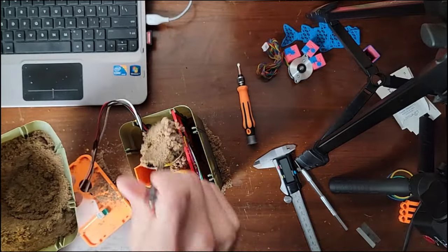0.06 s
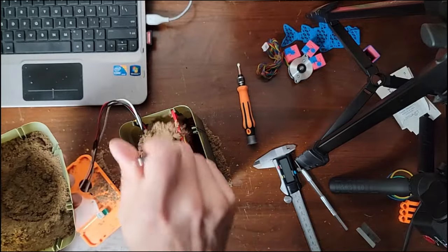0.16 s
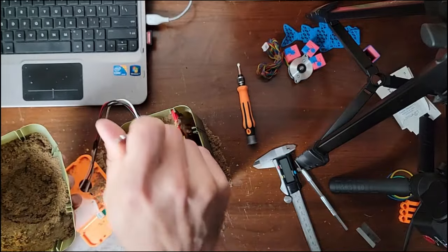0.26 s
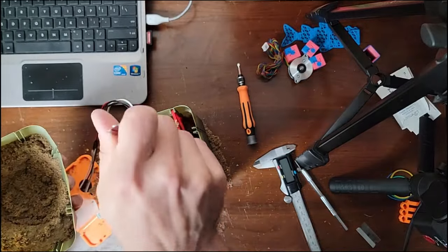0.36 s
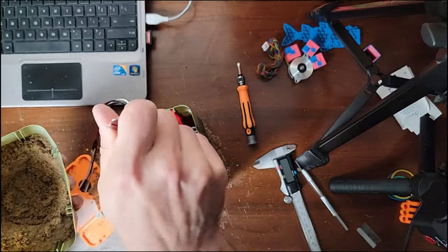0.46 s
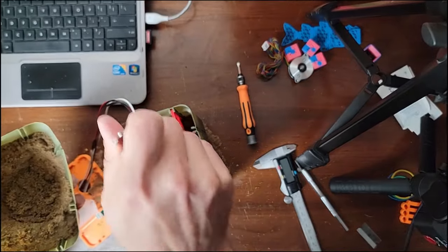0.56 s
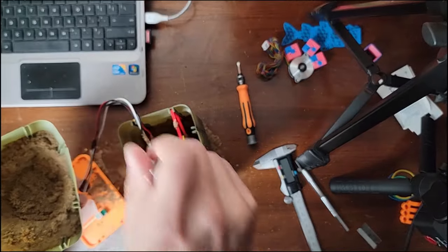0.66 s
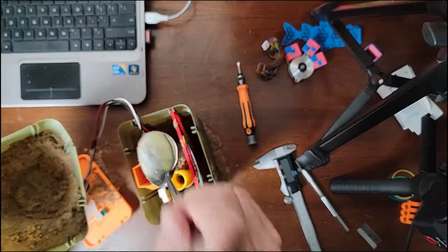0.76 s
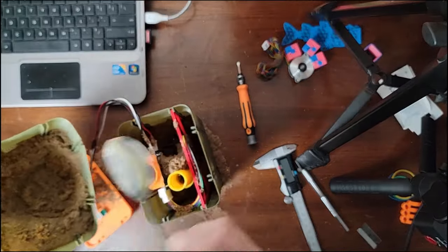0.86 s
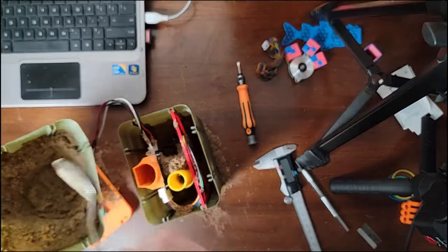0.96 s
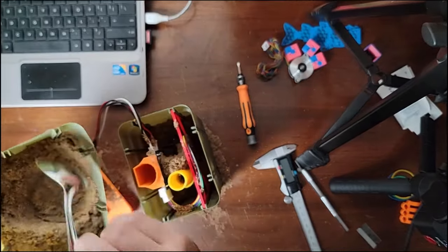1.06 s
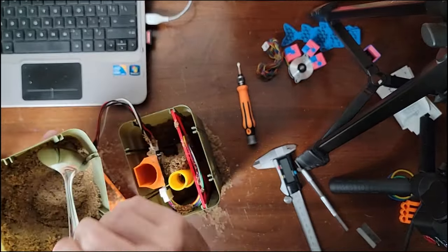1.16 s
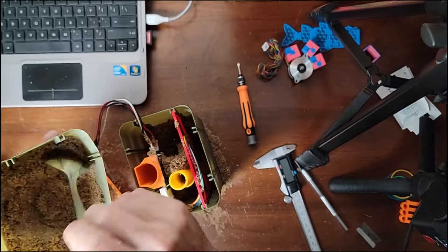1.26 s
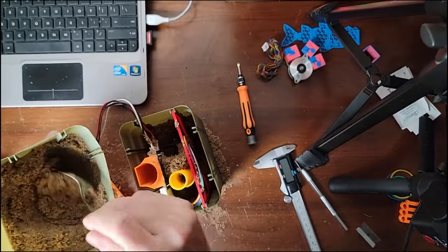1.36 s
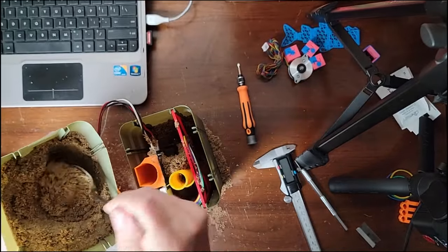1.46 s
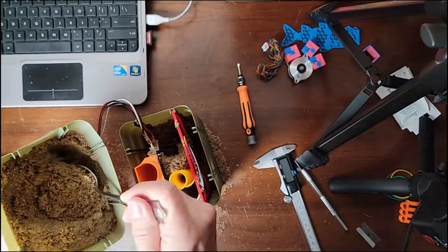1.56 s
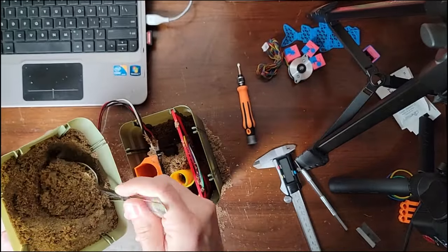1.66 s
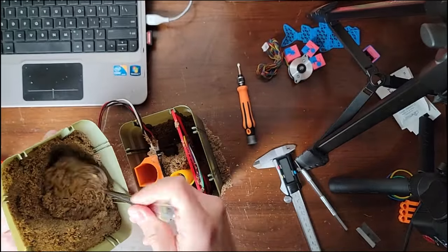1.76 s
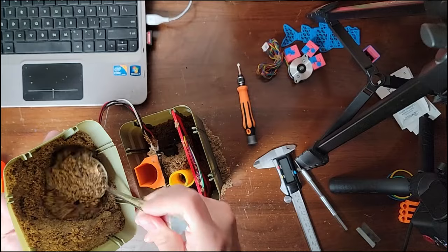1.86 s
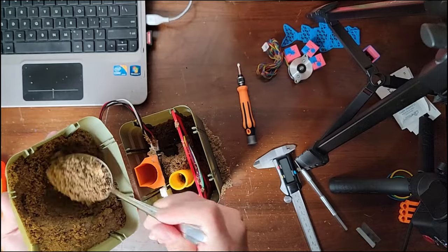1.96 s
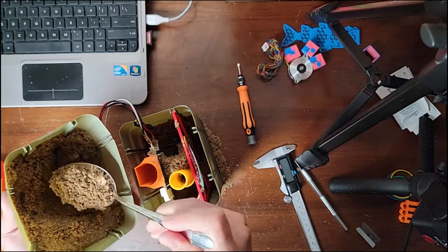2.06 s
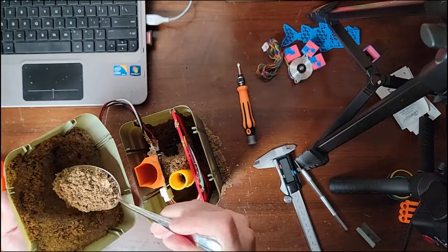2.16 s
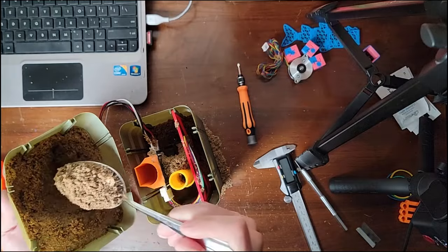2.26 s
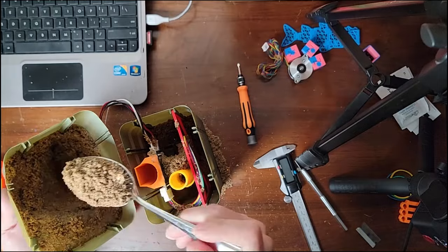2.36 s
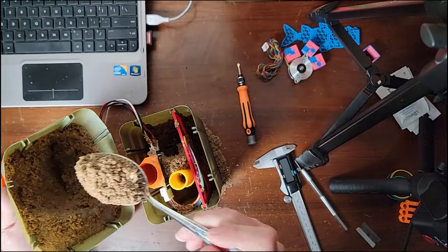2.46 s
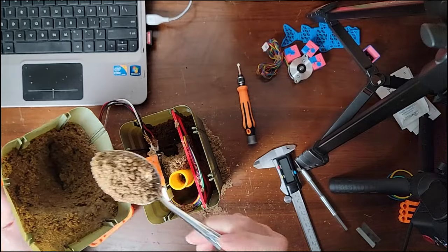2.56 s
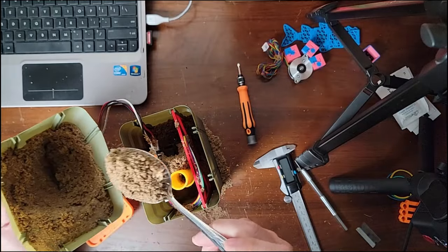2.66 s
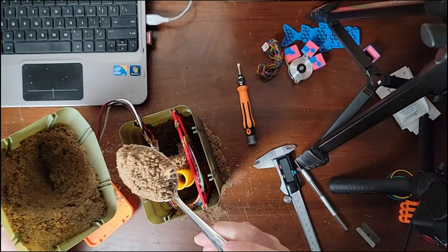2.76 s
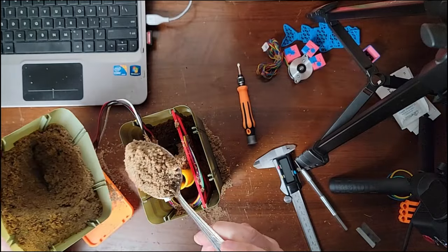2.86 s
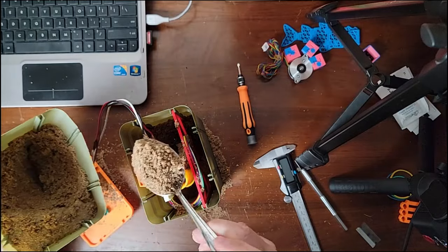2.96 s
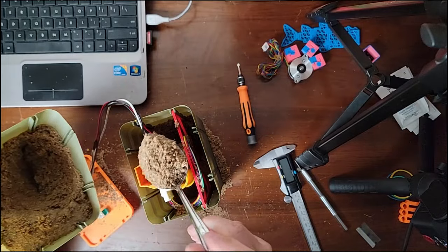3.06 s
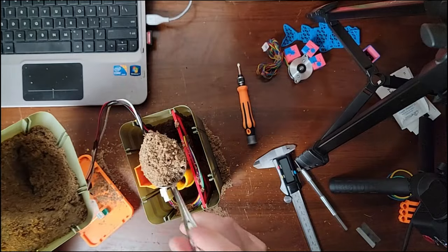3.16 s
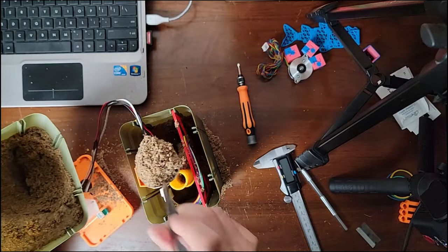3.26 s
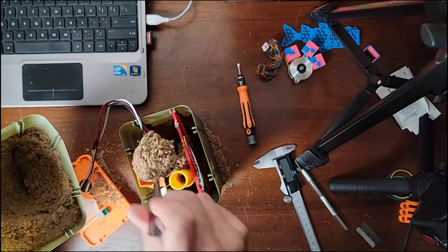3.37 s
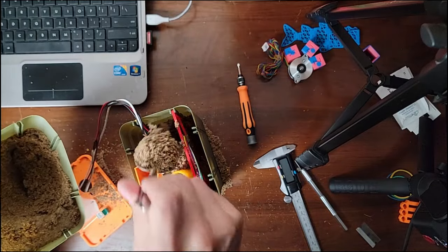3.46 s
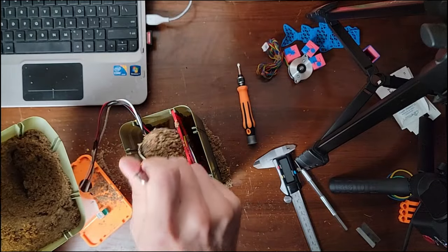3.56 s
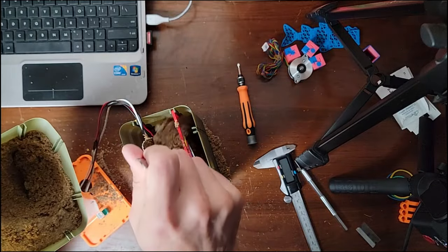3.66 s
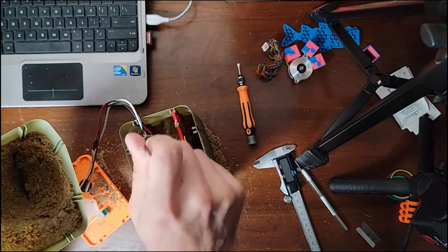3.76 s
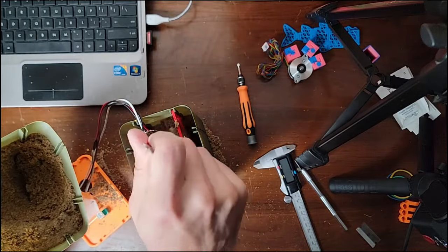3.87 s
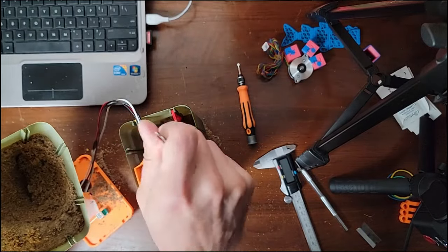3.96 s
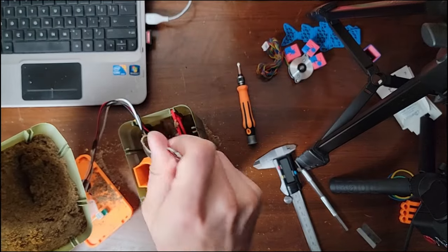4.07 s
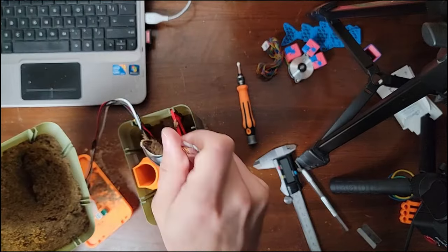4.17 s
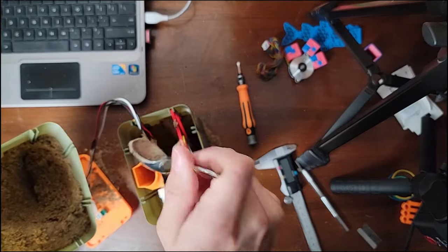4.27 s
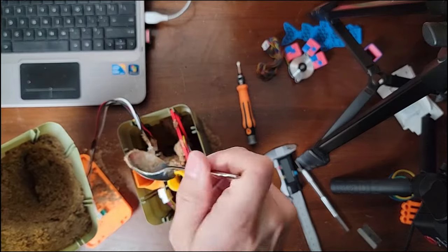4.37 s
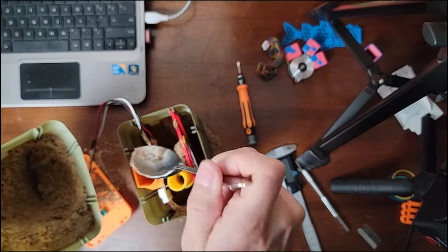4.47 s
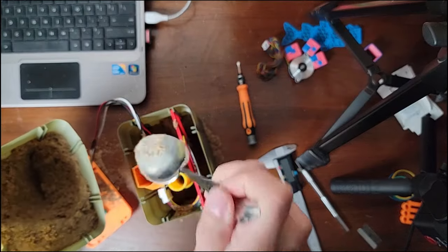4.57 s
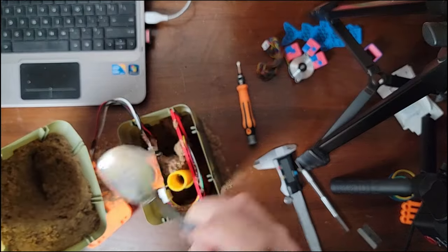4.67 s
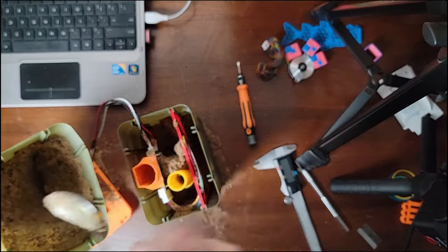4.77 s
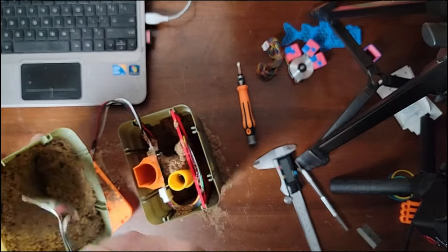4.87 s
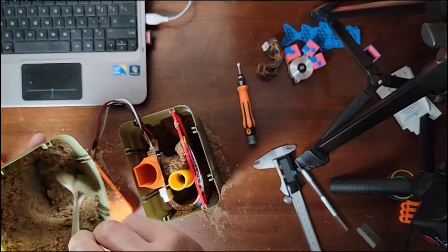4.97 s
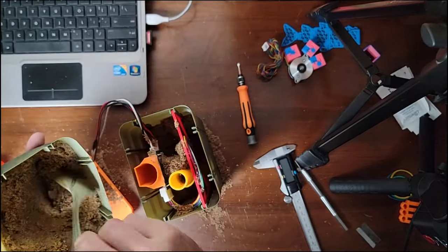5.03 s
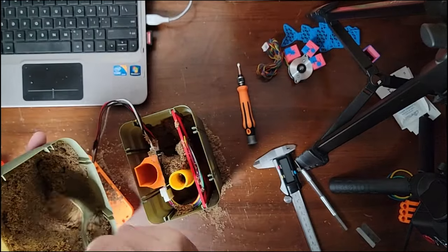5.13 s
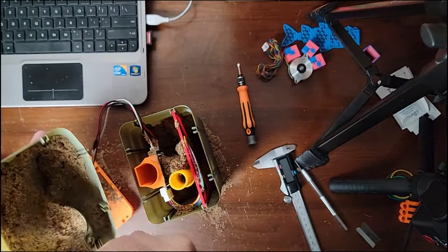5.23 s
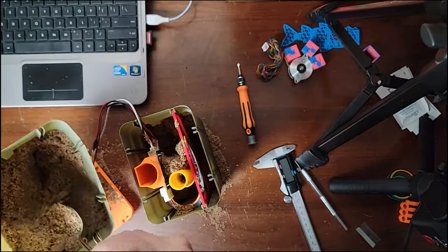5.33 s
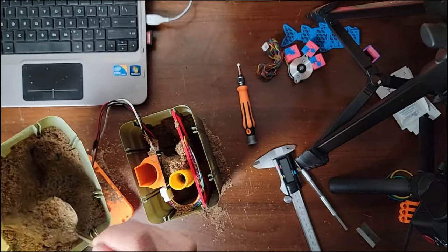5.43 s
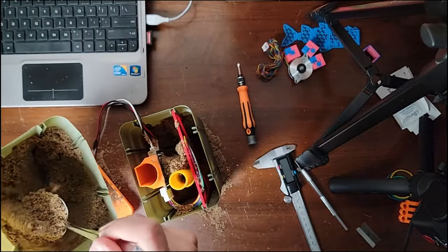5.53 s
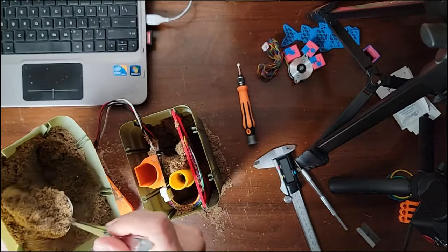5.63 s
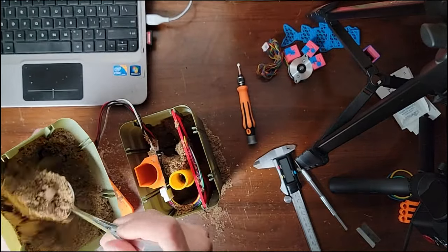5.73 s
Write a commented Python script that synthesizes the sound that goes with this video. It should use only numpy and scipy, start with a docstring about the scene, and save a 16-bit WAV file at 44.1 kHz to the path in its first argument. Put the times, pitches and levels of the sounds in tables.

```python
"""A steel spoon tips damp sand into a small plastic box, digs in a plastic tub, tips and digs again.
Random trains of grain impacts make the crackle and excite the containers' wall and base resonances.
Knocks ring the box and the wooden bench, stick-slip gives brief chirps, and loose crumbs trickle.
Leaning on a container sets the bench booming at its lowest mode, a sine whose pitch sags when loud.
A small room answers with a decaying noise tail, over faint rumble, hum and the sound of a fan."""
import sys
import numpy as np
from scipy import signal
from scipy.fft import rfft, irfft, next_fast_len
from scipy.io import wavfile
from scipy.ndimage import uniform_filter1d, map_coordinates

SR = 44100
rng = np.random.default_rng(int(sys.argv[2]) if len(sys.argv) > 2 else 0)


def unload_audio(sound):
    """Save the sound as a 16-bit wav file, at the path given as the first command line argument."""
    columns = np.transpose(np.atleast_2d(sound))
    # keep every value between -1 and 1, then stretch to whole-number steps
    steps = np.round(np.clip(columns, -1, 1) * 32767)
    wavfile.write(sys.argv[1], SR, steps.astype(np.int16))


N = 255760  # samples


def amp(db):
    """Logarithmic level: decibels to amplitude gain."""
    return 10 ** (np.asarray(db) / 20)


def unit(x):
    """Power normalisation: x scaled to rms 1."""
    return x / np.sqrt(np.mean(np.abs(x) ** 2) + 1e-20)


def clock():
    """Uniform sampling: the time of each sample in seconds."""
    return np.arange(N) / SR


def along(points, hz):
    """Logarithmic frequency scale: values interpolated between (frequency, value) points."""
    f, value = np.transpose(points)
    return np.interp(np.log(hz + 1), np.log(f + 1), value)


def wobble(rate):
    """Band-limited random modulation: a smooth curve through rate random knots a second."""
    knots = rng.standard_normal(int(N * rate / SR) + 4)
    return map_coordinates(knots, [clock() * rate])


def filtered(x, response):
    """Linear filtering: the spectrum of x times a complex response of frequency."""
    size = next_fast_len(N + SR // 2)
    hz = np.fft.rfftfreq(size, 1 / SR)
    return irfft(rfft(x, size) * response(hz), size)[:N]


def coloured(x, spectrum):
    """Spectral shaping: white x takes on a spectrum at the same power."""
    return filtered(x, lambda hz: unit(amp(along(spectrum, hz))))


def resonate(x, modes):
    """Modal superposition: white x excites a sum of damped resonances at the same power."""
    def response(f):
        total = 0
        for k, (centre, width, db) in enumerate(modes):
            mode = 1j * f * width / (centre * centre - f * f + 1j * f * width)
            total = total + (-1) ** k * amp(db) * mode  # neighbouring modes have opposite sign
        return unit(total)
    return filtered(x, response)


def grains(rate, spread_db):
    """Shot noise: tiny impacts of uneven size and random sign at random moments, rms 1."""
    size = amp(spread_db * np.clip(rng.standard_normal(N), -2.5, 2.5))
    sign = np.sign(rng.standard_normal(N))
    return unit((rng.random(N) < rate / SR) * size * sign)


def swell(s, rise_s, fade_s):
    """Exponential growth and decay: a flow that builds to its peak at s and dies away."""
    t = clock() - s
    return np.exp(np.minimum(t / max(rise_s, 1e-4), -t / max(fade_s, 1e-4)))


def flow(strokes, order):
    """Power addition: gain over time of overlapping strokes, from one of their level columns."""
    return np.sqrt(sum((amp(row[order]) * swell(*row[:3])) ** 2 for row in strokes))


def crush(contacts, order, rate, spread_db):
    """Granular fracture: each contact is a burst of breaking grains that builds to a peak and fades."""
    force, train = np.zeros(N), grains(rate, spread_db)
    for row in contacts:
        t = clock() - row[0]
        near = (t > -.1) & (t < .2)
        t = t[near]
        shape = np.exp(np.minimum(t / max(row[1], 1e-4), -t / max(row[2], 1e-4)))
        burst = shape * train[near]
        # the burst's energy does not depend on how many grains happen to fall in it
        even = np.linalg.norm(shape) / (np.linalg.norm(burst) + 1e-9)
        force[near] += amp(row[order]) * burst * even
    return force


def patches(x, depth_db):
    """Random spectral modulation: random gains over short spans of time and frequency."""
    z = signal.stft(x, nperseg=256)[2]
    field = uniform_filter1d(rng.standard_normal(z.shape), size=5, axis=0)
    field = uniform_filter1d(field, size=4, axis=1)
    return signal.istft(z * unit(amp(depth_db * unit(field))), nperseg=256)[1][:N]


def container(contacts, strokes, base, wall, grit, slide_spread_db, clump_db, slide_db, push_db):
    """Source and resonator: grain forces thud in the base, rattle the walls and crackle on the spoon."""
    clumps = unit(amp(clump_db * wobble(220)))  # damp sand gives way in small lumps

    def sliding():
        return clumps * grains(7000, slide_spread_db)

    strokes = [(s, rise, fade, db, db + wall_db) for s, rise, fade, db, wall_db in strokes]
    rubbing = flow(strokes, order=4)
    thud = crush(contacts, order=3, rate=2900, spread_db=5.0)
    thud += amp(push_db) * rubbing * sliding()
    rattle = crush(contacts, order=4, rate=5000, spread_db=7.5)
    rattle += rubbing * sliding()
    crackle = crush(contacts, order=5, rate=18000, spread_db=4.0)
    crackle += amp(slide_db) * flow(strokes, order=3) * sliding()
    walls = patches(resonate(rattle, wall), depth_db=3.5)  # random patches make the colour uneven
    return resonate(thud, base) + walls + patches(coloured(crackle, grit), depth_db=3.5)


# Times when the arm is clear of the laptop fan: (start [s], end [s])
FAN_CLEAR = [(0.98, 2.12), (2.899, 3.6), (4.781, 5.8)]
ARM_MOVE_S = 0.093


def arm_shade():
    """Acoustic shadowing: how far the arm covers the fan, 0-1."""
    t = clock()
    away_s = np.min([np.maximum(start - t, t - end) for start, end in FAN_CLEAR], axis=0)
    return np.clip(away_s / ARM_MOVE_S, 0, 1)


# Spectrum of the room's rumble: (frequency [Hz], relative level [dB])
AIR = [(20, -57), (50, -3), (90, 0), (140, -3.5), (220, -15.5), (450, -17), (900, -32), (1300, -46.5),
       (2200, -50.5), (4000, -47), (16000, -58)]
# Resonances of the fan's steady whir: (frequency [Hz], width [Hz], relative level [dB])
FAN = [(650, 110, 0.5), (1590, 73, -7), (2150, 60, -16), (3550, 160, -21.5)]
# Tones of the hum: (frequency [Hz], level [dB])
HUM = [(70, -58.5), (140, -63), (165, -66.5), (268, -74)]
WHISTLE_DB, ARM_SHADE_DB = -67, -20


def background():
    """Stationary noise and tones: room rumble, a fan's whir and shaded whistle, a phase-wavering hum."""
    air = amp(-52.5) * coloured(rng.standard_normal(N), AIR)
    whir = amp(-67.5) * resonate(rng.standard_normal(N), FAN)
    whistle_gain = amp(WHISTLE_DB + ARM_SHADE_DB * arm_shade())
    whistle = whistle_gain * resonate(rng.standard_normal(N), [(1187.5, 54, 0)])
    hum = np.zeros(N)
    for hz, db in HUM:
        hum += amp(db) * np.sqrt(2) * np.sin(2 * np.pi * hz * clock() + 0.34 * wobble(11))
    return air + whir + whistle + hum


ATTACK_S = 0.00097  # of every snap and stab
# Grains snapping between spoon and box: (time [s], fade [s], relative grit level [dB])
BOX_SNAPS = [(0.006, 0.003, -25), (0.039, .013, -25.5), (0.125, .004, -24.5), (0.329, 0.0022, -23.5),
             (0.34, 0.004, -19), (0.441, 0.0022, -28.5), (0.483, 0.0082, -20), (0.654, 0.029, -45),
             (0.683, 0.0039, -52), (0.723, 0.0021, -44), (2.749, 0.0071, -57.5), (3.098, 0.0019, -45),
             (3.311, 0.0084, -33.5), (3.326, 0.012, -25), (3.504, .003, -38.5), (3.622, 0.0036, -14.5),
             (3.712, 0.003, -22.5), (3.972, 0.0022, -30), (3.99, 0.0036, -25), (4.133, 0.003, -34.5),
             (4.261, 0.0031, -47.5)]
SNAP_WALL_DB, SNAP_THUD_DB = -15.5, -13  # the box's answer to a snap, relative to its grit


def box_contacts():
    """Brittle fracture: snaps start at once; (time, rise, fade, thud dB, wall dB, grit dB)."""
    return [(s, ATTACK_S, fade, db + SNAP_THUD_DB, db + SNAP_WALL_DB, db) for s, fade, db in BOX_SNAPS]


# Sand sliding off the spoon into the box:
# (peak time [s], rise [s], fade [s], relative grit level [dB], wall over grit [dB])
POURS = [(0.08, 0.088, 0.12, -37.5, -8), (0.166, 0.027, 0.014, -28, -9.5), (0.297, 0.05, 0.033, -22, -17),
         (0.429, 0.047, 0.043, -34.5, -9.5), (3.622, 0.025, .035, -35, -7), (3.736, 0.017, 0.06, -20.5, -7),
         (3.834, 0.0067, 0.0068, -28, -8), (4.005, 0.063, 0.07, -36.5, -12.5)]
# Modes of the box's base: (frequency [Hz], width [Hz], relative level [dB])
BOX_BASE = [(252, 47, -1), (319, 80, -2), (359, 79, -2), (429.2, 22, -5.5), (588, 60, -2)]
# Resonances of the box's walls: (frequency [Hz], width [Hz], relative level [dB])
BOX_WALL = [(711, 130, -1), (880, 99, -0.5), (1194, 580, -4.5), (1575, 110, 1.5), (1658, 73, -2.5),
            (1860, 170, -5), (2213, 97, -7), (2950, 500, -3), (3610, 570, -5)]
# Spectrum of grit on the spoon at the box: (frequency [Hz], relative level [dB])
BOX_GRIT = [(800, -16.5), (2000, -7.5), (3800, -4.5), (5500, -5.5), (7000, -2.5), (9000, 1), (11000, -4),
            (13500, -5.5), (16000, -12.5)]


def box():
    """Forced vibration: snapping and pouring sand excites the small box."""
    return container(box_contacts(), POURS, BOX_BASE, BOX_WALL, BOX_GRIT,
                     slide_spread_db=2.2, clump_db=1.55, slide_db=0.5, push_db=-11.5)


BOOM_RISE_S, BOOM_FALL_DB_PER_S = 0.03, 199.5


def lean(s, hold_s):
    """Transient excitation: the bench's swing builds to s, holds briefly and rings out."""
    t = clock() - s
    rise = np.exp(-(np.minimum(t, 0) / BOOM_RISE_S) ** 2)
    return rise * amp(-BOOM_FALL_DB_PER_S * np.maximum(t - hold_s, 0))


# The spoon leaning on a container: (time of full swing [s], hold [s], level [dB])
BOOMS = [(0.02, .02, -25.5), (0.075, 0.026, -23), (0.224, 0.025, -26.5), (0.375, 0.07, -38),
         (0.536, 0.039, -17), (0.636, 0.037, -27), (3.136, 0.018, -15), (3.285, 0.013, -22.5),
         (3.371, 0.01, -19), (3.425, 0.017, -27), (3.579, .04, -38.5), (3.77, 0.042, -27),
         (3.865, 0.017, -28.5), (3.98, 0.01, -34.5), (5.16, 0.0088, -38)]
BOOM_HZ = 72.3  # for a small swing, before the random wobble


def boom():
    """Amplitude-dependent resonance: the bench's lowest mode runs a little slower in wide swings."""
    swing = np.max([amp(db) * lean(s, hold_s) for s, hold_s, db in BOOMS], axis=0)
    hz = BOOM_HZ * (1 - .07 * swing / swing.max() + .03 * wobble(18))
    tone = np.sqrt(2) * np.sin(2 * np.pi * np.cumsum(hz) / SR)
    rumble = amp(-27.0) * resonate(rng.standard_normal(N), [(113, 55, 0)])
    return swing * (tone + rumble)


# The spoon or a falling lump bumping the box: (time [s], relative bench level [dB],
# base level [dB], wall level [dB], hardness [Hz], damping [ratio to the sand-filled box])
KNOCKS = [(0.039, -2, 7.5, 11.5, 2400, 0.3), (0.212, -7, -10, -8, 1100, 0.44),
          (0.4843, -11.5, -2.5, 9.5, 3830, 0.92), (0.501, -3, 0, 3, 1805, 0.79),
          (2.746, -42.5, -10.5, -3.5, 1413, 1), (3.089, 11.5, 4.5, 9.5, 1150, 0.86),
          (3.215, 4, -14.5, -22, 1540, .8), (3.327, 5, 9.5, 6.5, 1600, .55), (3.397, 1, -6, -9, 1100, 0.87),
          (3.724, -6, -3, -2.5, 1500, 1)]
# The bench's upper modes: (frequency [Hz], width [Hz], relative level [dB])
BENCH = [(97.5, 12, 1), (136, 24, -13.5)]


def knocks():
    """Impact excitation: blows ring box and bench; sand on the spoon softens them and adds chatter."""
    t = np.arange(SR // 25) / SR
    out = np.zeros(N)
    for s, bench_db, base_db, wall_db, hardness_hz, damping in KNOCKS:
        push = t ** 2 * np.exp(-2 * np.pi * hardness_hz * t)
        push = push / push.sum()
        chatter = grains(1200, spread_db=0.5)[:len(t)] * np.exp(-t / 0.0054)
        chatter = unit(chatter) / np.sqrt(len(t))
        rough = 0.25 * push + 0.66 * signal.fftconvolve(push, chatter)[:len(t)]
        delay = (round(s * SR), 0)
        smooth_blow, rough_blow = np.pad(push, delay), np.pad(rough, delay)
        base = [(hz, width * damping, db) for hz, width, db in BOX_BASE]
        wall = [(hz, width * damping, db) for hz, width, db in BOX_WALL]
        out += amp(bench_db) * resonate(smooth_blow, BENCH)
        out += amp(base_db) * resonate(rough_blow, base)
        out += amp(wall_db) * resonate(rough_blow, wall)
    return out


# The spoon sticking and slipping in a chirp or grunt:
# (time [s], mean pitch [Hz], relative peak level [dB], half length [s])
SLIPS = [(0.069, 8020, -14, 0.0021), (1.247, 1451, -10.5, 0.0018), (3.747, 9180, -29, 0.0026),
         (5.074, 1154, -6.5, 0.0011), (5.1236, 325, -8, 0.0018)]


def slips():
    """Stick-slip friction: brief vibrations, unsteady in pitch."""
    out = np.zeros(N)
    for s, hz, db, half_s in SLIPS:
        t = clock() - s
        near = np.abs(t) < .02
        # a new random pitch about every millisecond
        jitter = rng.standard_normal(40).repeat(SR // 1000 + 1)[:near.sum()]
        pitch = hz * (1 + .07 * jitter)
        envelope = np.exp(-(t[near] / half_s) ** 2)
        out[near] += amp(db) * envelope * np.sin(2 * np.pi * np.cumsum(pitch) / SR)
    return out


# Loose crumbs trickling off the spoon: (time of thickest fall [s], half length [s], relative level [dB])
SPILLS = [(0.915, 0.12, -62.5), (1.86, 0.041, -52), (1.986, 0.025, -40), (2.237, 0.027, -63.5),
          (3.308, .03, -51), (3.557, 0.047, -42.5), (4.152, .02, -42.5), (4.286, 0.092, -54),
          (5.747, 0.023, -52.5)]


def crumbs():
    """Clustered shot noise: sparse crumbs fall and shatter into a few grains each."""
    shatter = np.exp(-np.arange(SR // 50) / SR / 0.0044)
    falls = np.abs(signal.fftconvolve(np.abs(grains(130, spread_db=2.5)), shatter)[:N])
    trickle = sum(amp(db) * swell(s, half, half) for s, half, db in SPILLS)
    grit = unit(coloured(falls * grains(8300, spread_db=0.5), BOX_GRIT))
    return amp(-4.5) * trickle * grit


# The spoon stabbing into the tub's sand and stopping dead:
# (time [s], fade [s], relative wall level [dB], grit over wall [dB])
TUB_STABS = [(1.166, 0.018, -22.5, -11), (1.537, .007, -35.5, -12), (2.37, 0.03, -51, -12),
             (5.006, 0.01, -10.5, -1.5), (5.123, 0.0019, -13, 8), (5.16, 0.0063, -19, 3),
             (5.282, 0.012, -20.5, -10.5), (5.349, 0.0034, -36, -2), (5.607, 0.0012, -42.5, 4.5)]
# Packed sand resisting, then giving way as fast:
# (time [s], half length [s], relative wall level [dB], grit over wall [dB], thud over wall [dB])
TUB_CRUNCHES = [(1.22, .006, -25, -6.5, -22), (1.23, 0.012, -19.5, -5, -13.5),
                (1.247, 0.0022, -12, -9.5, -17), (1.312, 0.001, -23.5, -23, -17),
                (1.503, 0.0061, -22.5, -14.5, -9.5), (5.036, 0.0035, -14, -1, -10.5),
                (5.06, 0.0038, -23, -9, -2), (5.076, 0.0029, -33, 19, -3), (5.096, 0.0098, -21, 2.5, -6),
                (5.113, 0.0042, -16, -3, -4.5), (5.14, 0.0098, -24, -3.5, 1), (5.154, 0.003, -11, 4.5, -3),
                (5.335, 0.0038, -21.5, -1.5, -18)]
STAB_THUD_DB = -4  # the tub's base under a stab, relative to its walls


def tub_contacts():
    """Granular yielding: stabs start at once, crunches build; (time, rise, fade, thud, wall, grit dB)."""
    stabs = [(s, ATTACK_S, fade, db + STAB_THUD_DB, db, db + grit_db)
             for s, fade, db, grit_db in TUB_STABS]
    crunches = [(s, half, half, db + thud_db, db, db + grit_db)
                for s, half, db, grit_db, thud_db in TUB_CRUNCHES]
    return stabs + crunches


# The spoon dragging through the tub:
# (peak time [s], rise [s], fade [s], relative grit level [dB], wall over grit [dB])
DRAGS = [(1.279, 0.028, 0.12, -42, -9.5), (1.51, 0.022, .035, -50.5, 6.5), (1.694, 0.036, 0.037, -53.5, 10),
         (1.99, 0.16, 0.067, -58, -1), (5.018, .003, 0.062, -29.5, -4.5), (5.23, 0.055, 0.11, -39, -12),
         (5.34, 0.0246, 0.024, -36, -7), (5.564, 0.066, 0.039, -48, -16), (5.78, 0.18, 0.035, -63, 5.5)]
# Modes of the tub's base: (frequency [Hz], width [Hz], relative level [dB])
TUB_BASE = [(123, 340, -13), (277, 66, 1.5), (310, 74.5, 0), (471, 48, 1), (606, 28, 1.5)]
# Resonances of the tub's walls: (frequency [Hz], width [Hz], relative level [dB])
TUB_WALL = [(710, 59, -1.5), (994, 150, 0.5), (1227, 99, 0.5), (1366, 120, -2), (1627, 200, 0),
            (2346, 150, -1.5), (2720, 370, -7), (3300, 330, -7), (4500, 900, -15)]
# Spectrum of grit on the spoon in the tub: (frequency [Hz], relative level [dB])
TUB_GRIT = [(800, -23.5), (2000, -3), (3800, -2), (5200, -3), (6400, -2), (7800, -2), (9500, -1.5),
            (11500, -7.5), (16000, -9)]


def tub():
    """Forced vibration: stabbing, crunching and dragging in sand excites the tub."""
    return container(tub_contacts(), DRAGS, TUB_BASE, TUB_WALL, TUB_GRIT,
                     slide_spread_db=3.5, clump_db=-0.5, slide_db=0, push_db=-6.0)


def nearby(x, echo_db):
    """Early reflection: the bench top and the things on it throw back quick weak copies."""
    delays_s = rng.uniform(.0006, .012, 8)
    echoes = sum(np.pad(x, (int(d * SR), 0))[:N] * rng.choice([-1, 1]) for d in delays_s)
    return x + amp(echo_db) * echoes


# Reverberation time, for a 60 dB decay: (frequency [Hz], time [s])
ROOM = [(150, 0.42), (1000, 0.33), (4000, 0.19), (9000, 0.26), (16000, 0.56)]


def room(x):
    """Reverberation: a noise tail in which each frequency dies at its own speed."""
    hz, t, z = signal.stft(rng.standard_normal(SR * 3 // 4), SR, nperseg=256)
    decay = amp(-60 * t / along(ROOM, hz)[:, None])
    tail = signal.istft(z * decay, SR, nperseg=256)[1]
    tail = np.pad(tail / np.linalg.norm(tail), (SR // 150, 0))  # the tail starts after 1/150 s
    return signal.fftconvolve(x, tail)[:N]


def scene():
    """Superposition: both containers on the bench, in the room."""
    sources = box() + knocks() + slips() + crumbs() + tub()
    sand = amp(-2.5) * nearby(sources, echo_db=-21)
    return (sand + amp(-12) * room(sand) + boom() + background())[None]


TOP_HZ = 16100


def record(dry):
    """Soft saturation and band limiting: high peaks are rounded off and the top treble is removed."""
    rounded = dry[0] / (1 + np.abs(dry[0] / .85) ** 6) ** (1 / 6)
    return filtered(rounded, lambda hz: 1 / (1 + np.minimum(hz / TOP_HZ, 2) ** 200))[None]


dry = scene()
out = record(dry)
unload_audio(out)
```